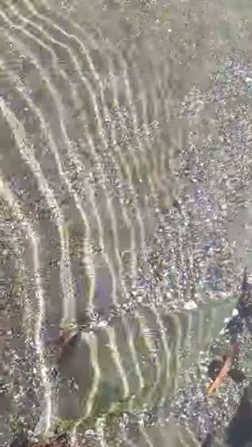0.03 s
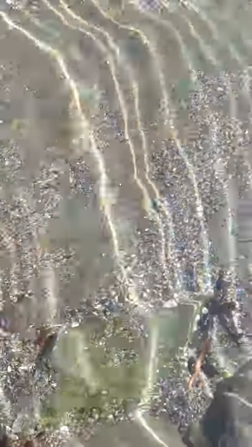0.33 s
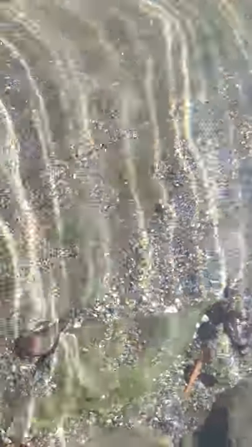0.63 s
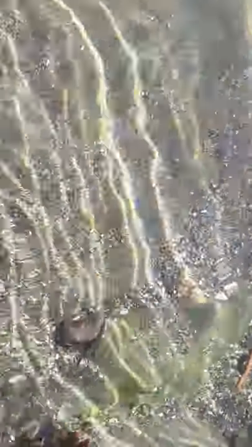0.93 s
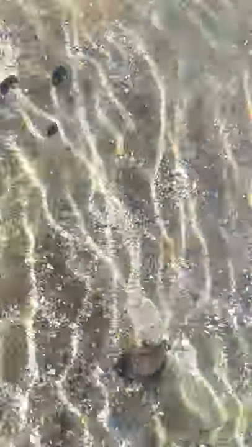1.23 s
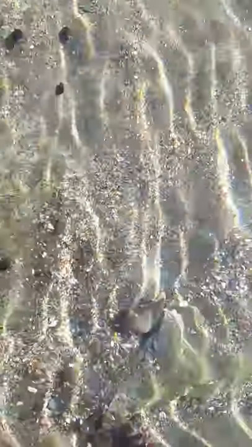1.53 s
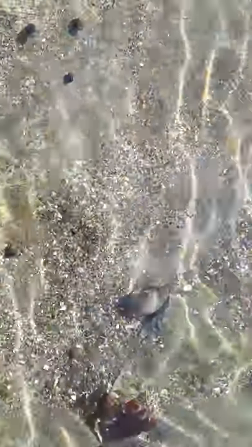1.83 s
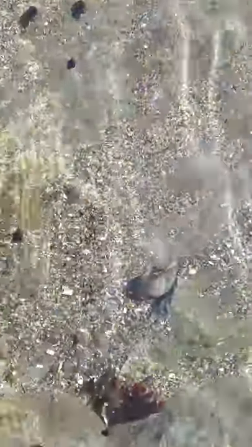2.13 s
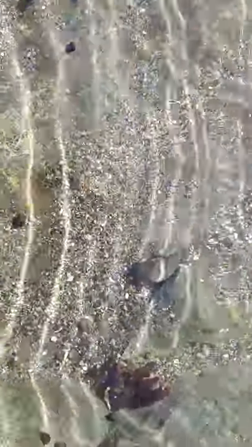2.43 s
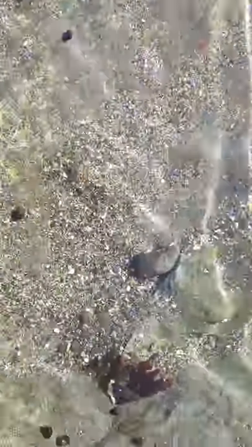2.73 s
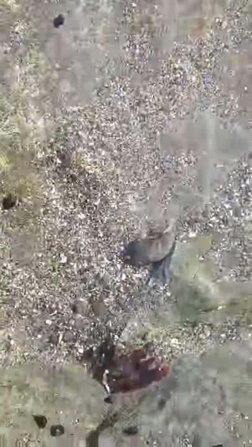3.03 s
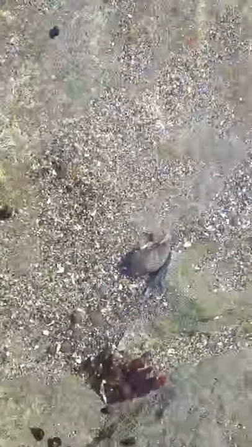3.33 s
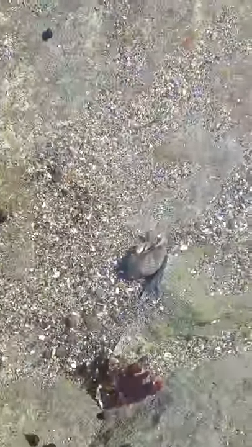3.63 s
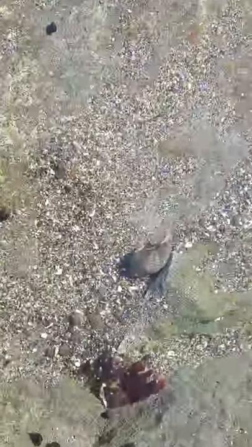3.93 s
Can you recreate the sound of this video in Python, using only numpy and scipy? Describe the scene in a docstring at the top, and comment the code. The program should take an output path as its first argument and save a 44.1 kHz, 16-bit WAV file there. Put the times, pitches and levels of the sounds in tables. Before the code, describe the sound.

Distant surf rushes steadily over a low wind rumble at a shallow, pebbly shore. A small ripple splashes early on, followed by a few droplets and faint foam fizz, while gusts buffet the microphone, mostly on the left.

```python
"""A steady rush of distant surf and a low rumble of wind, heard from shallow water at a shore.
Foam fizzes faintly and tiny bubbles burst in bright ticks. A small ripple splashes once and a few
droplets follow, each a ringing bubble in a puff of spray. Gusts buffet the microphone, mostly
on its left port. The recorder dulls everything above 7 kHz."""
import sys
import numpy as np
from scipy import signal
from scipy.fft import rfft, irfft
from scipy.io import wavfile
from scipy.ndimage import uniform_filter1d, map_coordinates

SR = 44100
rng = np.random.default_rng(int(sys.argv[2]) if len(sys.argv) > 2 else 0)


def generate_wav(sig):
    """Save sig (samples, or channels by samples) to the path in sys.argv[1] as 16-bit PCM at SR."""
    pcm = np.round(np.clip(np.atleast_2d(sig).T, -1, 1) * 32767).astype(np.int16)
    wavfile.write(sys.argv[1], SR, pcm)


N = 4 * SR
HZ, T = np.fft.rfftfreq(N, 1 / SR), np.arange(N) / SR


def amp(db):
    """Decibels to gain."""
    return 10 ** (np.asarray(db) / 20)


def spectrum(points):
    """A table interpolated over HZ on a log-frequency axis."""
    freq_hz, value = np.transpose(points)
    return np.interp(np.log(HZ + 1), np.log(freq_hz + 1), value)


def curve(points):
    """A table interpolated over T."""
    return np.interp(T, *np.transpose(points))


def pan(left_minus_right_db):
    """Left and right gains; the nearer port gets 1."""
    return amp(np.minimum([[left_minus_right_db], [-left_minus_right_db]], 0))


def add(mix, start_s, sound):
    """Mixes in a stereo sound."""
    part = mix[:, round(start_s * SR):][:, :sound.shape[1]]
    part += sound[:, :part.shape[1]]


def unit_rms(x):
    """Scales to rms 1."""
    return x / np.sqrt(np.mean(x ** 2) + 1e-20)


def band_noise(samples, centre_hz, half_width_octaves, order):
    """Stereo noise in a band around one pitch."""
    octaves = np.log2((np.fft.rfftfreq(samples, 1 / SR) + 1) / centre_hz)
    white = rfft(rng.standard_normal((2, samples)))
    return irfft(white / (1 + (octaves / half_width_octaves) ** order))


def noise_pair(density_db, correlation, patch_depth_db):
    """Partly alike stereo noise with drifting patches of level; a complex correlation carries a delay."""
    left, independent = rfft(rng.standard_normal((2, N)))
    correlation = correlation / np.maximum(abs(correlation) / 0.99, 1)
    right = correlation * left + np.sqrt(1 - abs(correlation) ** 2) * independent
    noise = irfft(np.array([left, right]) * amp(density_db), N) * np.sqrt(SR / 2)
    frames = signal.stft(noise, nperseg=512)[2]
    patches = uniform_filter1d(rng.standard_normal(frames.shape[1:]), size=7, axis=0)  # over frequency
    patches = unit_rms(uniform_filter1d(patches, size=12, axis=1))  # over time
    return signal.istft(frames * amp(patch_depth_db * patches))[1][:, :N]


# surf spectrum at each port: freq_hz, density_db
SURF_LEFT = [(100, -75), (550, -70), (700, -73), (820, -71.5), (950, -76), (1400, -76.5), (2000, -80.5),
             (2450, -81.5), (3400, -85.5), (3900, -85.5), (4500, -89), (6300, -90), (7200, -98),
             (16000, -106)]
SURF_RIGHT = [(100, -77), (500, -71.5), (640, -72.5), (810, -76.5), (910, -72.5), (1200, -76), (1600, -76),
              (1950, -73), (2250, -74), (2450, -74), (3200, -82.5), (3900, -85.5), (4700, -91.5),
              (6100, -92.5), (7200, -99.5), (16000, -106)]
# likeness of the ports, direct sound aside: freq_hz, correlation
SURF_CORRELATION = [(430, 0.63), (660, 0.078), (790, -0.33), (900, 0.5), (1050, 0.01), (1650, -0.41),
                    (2000, 0.056), (6600, -0.086)]
# slow swell: time_s, gain_db
SURF_SWELL = [(0, 0.5), (.7, 1.04), (1.2, 0.4), (1.8, 0.3), (2.1, 1), (2.4, 0), (3.0, 1), (4, 0.5)]

def surf(direct_share=0.27, right_delay_s=0.000445, direct_above_hz=1980):
    """Distant surf: a wide rush with a slight swell; part of its treble reaches the left port first."""
    delay = np.exp(-2j * np.pi * HZ * right_delay_s)
    direct = direct_share * delay / (1 + (direct_above_hz / (HZ + 1)) ** 8)
    density_db = np.array([spectrum(SURF_LEFT), spectrum(SURF_RIGHT)])
    rush = noise_pair(density_db, spectrum(SURF_CORRELATION) + direct, patch_depth_db=0.66)
    return rush * amp(curve(SURF_SWELL))


# rumble spectrum: freq_hz, density_db
WIND_SPECTRUM = [(20, -99), (40, -83), (60, -67), (85, -55.5), (125, -51.5), (180, -53.5), (250, -58.5),
                 (330, -64.5), (450, -69), (700, -81), (1500, -105)]
# wind strength: time_s, gain_db
WIND_STRENGTH = [(0, -0.5), (.4, 0.5), (.9, 1), (1.5, 1), (2.25, 1), (2.65, 0.5), (2.8, -1.5), (2.9, 1.5),
                 (3.5, -1), (3.75, 0.5), (4, 0)]

def wind_rumble(left_minus_right_db=1.6):
    """The low steady roar of wind, nearly the same at both ports."""
    roar = noise_pair(spectrum(WIND_SPECTRUM), correlation=0.78, patch_depth_db=-0.1)
    balance = amp([[left_minus_right_db / 2], [-left_minus_right_db / 2]])
    return roar * amp(curve(WIND_STRENGTH)) * balance


# foam crackle before its band-pass: time_s, level_db
FOAM_LEVEL = [(0, -53), (.09, -49), (.25, -59), (.35, -60), (.425, -44), (.52, -65), (.66, -63), (.76, -54),
              (.98, -56), (1.1, -45), (1.3, -62), (1.95, -74), (2.09, -50), (2.3, -69), (4, -72)]

def foam_fizz(grains_per_s=2500, spread_db=1.0, low_hz=8000, high_hz=13500):
    """A fine crackle of foam as each ripple runs out."""
    grains = rng.standard_normal((2, N)) * (rng.random((2, N)) < grains_per_s / SR)
    grains *= amp(spread_db * np.minimum(rng.exponential(1, (2, N)), 3))
    crackle = unit_rms(grains) * amp(curve(FOAM_LEVEL))
    band_pass = 1 / (1 + (low_hz / (HZ + 1)) ** 6 + (HZ / high_hz) ** 6)
    return irfft(rfft(crackle) * band_pass, N)


# bursting bubbles: start_s, level_db, pitch_hz, left_minus_right_db
BUBBLE_TICKS = [(.0737, -34, 11900, -4), (.2668, -38, 10500, 0), (.387, -36, 12500, -1),
                (0.397, -24, 9700, -1), (.416, -35, 10800, 4), (.442, -31, 9700, 0),
                (0.7275, -27, 11800, -9), (.7642, -29.5, 11800, -9), (.78, -34, 13500, -13),
                (.835, -35, 13000, -3), (.9223, -36, 12400, -5), (1.0373, -27, 9190, -11),
                (1.0704, -32, 12500, -8), (1.1072, -20, 11400, -8), (1.1115, -24, 14800, -7),
                (1.115, -31, 13530, -7), (1.1757, -36, 13500, 0), (1.204, -33, 14500, -6),
                (1.511, -33, 14520, -4), (2.0616, -29, 14230, -7), (2.0665, -33, 10000, -3),
                (2.0984, -36, 12550, -4), (2.1628, -37, 12900, 0)]

def bubble_ticks(samples=512, decay_s=0.00091):
    """Tiny bubbles burst, each a sharp snap around its own pitch."""
    out, t = np.zeros((2, N)), np.arange(samples) / SR
    envelope = np.exp(-t / decay_s)
    snap_rms = np.sqrt(np.mean(envelope ** 2)) / 2  # peaks near 1
    for start_s, level_db, pitch_hz, pan_db in BUBBLE_TICKS:
        snap = band_noise(samples, pitch_hz, half_width_octaves=0.29, order=2) * envelope
        add(out, start_s, unit_rms(snap) * snap_rms * amp(level_db) * pan(pan_db))
    return out


# splash and droplets: start_s, level_db, pitch_hz, decay_s, left_minus_right_db
DROPS = [(0.3677, -31, 4280, 0.0025, -6), (.3884, -37, 6300, 0.0041, 2), (0.396, -23, 5570, 0.0026, 5),
         (0.3952, -27, 1640, 0.0036, 2), (0.4075, -29.5, 1464, 0.016, -7), (0.408, -34.5, 5270, 0.0065, 3),
         (.409, -31, 1880, .013, 0), (0.4113, -29, 2450, 0.0083, -13), (0.4265, -28.5, 2840, 0.002, 7),
         (0.7242, -20.5, 2920, 0.0023, -12), (1.07, -31.5, 4596, 0.002, -11), (2.067, -37, 5000, 0.0018, 2),
         (2.0989, -27, 4540, 0.0016, -7)]

def drops(samples=4096, rise_per_s=3.3, spray_share=0.58, attack_s=0.00028):
    """Each drop rings a bubble of rising pitch inside a puff of spray."""
    out, t = np.zeros((2, N)), np.arange(samples) / SR
    for start_s, level_db, pitch_hz, decay_s, pan_db in DROPS:
        cycles = pitch_hz * (t + rise_per_s * t ** 2 / 2) + rng.random((2, 1)) / 4
        bubble = np.sin(2 * np.pi * cycles)
        spray = unit_rms(band_noise(samples, pitch_hz, half_width_octaves=0.35, order=4))
        envelope = (1 - np.exp(-t / attack_s)) * np.exp(-t / decay_s)
        drop = ((1 - spray_share) * bubble + spray_share * spray) * envelope
        add(out, start_s, drop * amp(level_db) * pan(pan_db))
    return out


# eddies on the ports: centre_s, half_width_s, level_db, left_minus_right_db
GUSTS = [(0.476, 0.019, -15, 31), (0.514, 0.027, -26.5, 11), (0.563, 0.022, -25.5, -12),
         (0.598, 0.027, -20, 28), (0.622, 0.012, -21.5, 12), (0.649, 0.009, -17, 28),
         (0.713, 0.042, -18, 31), (0.754, 0.0091, -22.5, 15), (0.791, 0.021, -15.5, 26),
         (0.85, 0.031, -22.5, 26), (0.886, 0.018, -23.5, 18), (1.001, 0.014, -19, 29),
         (1.04, 0.024, -22, 22), (1.118, 0.08, -24, 20), (1.207, 0.017, -19.5, 24), (1.284, 0.014, -20, 32),
         (1.313, 0.048, -26.5, 28), (1.616, 0.075, -27, 18), (1.798, 0.037, -24.5, 14),
         (2.273, 0.15, -30.5, -19), (2.48, 0.03, -19, 19), (2.601, 0.017, -21.5, 27)]
# turbulence colour at speed ratio 1: freq_hz, gain_db
GUST_COLOUR = [(20, -37), (45, -14), (100, 3.5), (170, 2), (280, -3), (420, -18.5), (650, -30),
               (1200, -43.5), (3000, -55)]
# air speed, scaling the colour's frequencies: time_s, speed_ratio
AIR_SPEED = [(.48, 0.92), (.56, 0.99), (.6, 1.38), (.63, 1.495), (.647, 2.09), (.668, 1.4), (.705, 1.4),
             (.725, .85), (.79, 1.0), (.86, 0.96), (.883, 1.7), (.92, 1.14), (1.0, 1.26), (1.04, .95),
             (2.6, 0.95)]

def gusts():
    """Each eddy is a short swell of low turbulence, mostly on one port; faster air raises its colour."""
    out = np.zeros((2, N))
    turbulence = irfft(rfft(rng.standard_normal(N)) * amp(spectrum(GUST_COLOUR)), N)
    travel_samples = np.cumsum(curve(AIR_SPEED))
    flow = map_coordinates(turbulence, [travel_samples % N], order=3, mode="wrap")
    for centre_s, half_width_s, level_db, pan_db in GUSTS:
        bell = np.exp(-2 * np.minimum(((T - centre_s) / half_width_s) ** 2, 20))
        eddy = unit_rms(flow * bell) * np.sqrt(np.mean(bell ** 2))
        out += eddy * amp(level_db) * pan(pan_db)
    return out


def scene():
    """Surf, wind and nearby water together."""
    return surf() + wind_rumble() + foam_fizz() + bubble_ticks() + drops() + gusts()


# recorder response: freq_hz, gain_db
RECORDER_RESPONSE = [(7100, -1.5), (7500, -8.5), (7900, -24), (8150, -28), (8600, -18), (12000, -20),
                     (15800, -20.5)]
BAND_LIMIT_HZ = 15830

def record(dry):
    """The recorder's dull top and its band limit."""
    dulled = irfft(rfft(dry) * amp(spectrum(RECORDER_RESPONSE)), N)
    low_pass = signal.firwin(511, BAND_LIMIT_HZ, window=("kaiser", 9), fs=SR)
    return signal.oaconvolve(dulled, low_pass[None], "same")


dry = scene()
out = record(dry)
generate_wav(out)
```